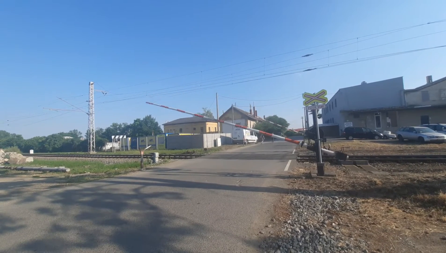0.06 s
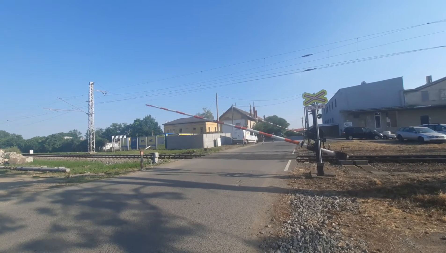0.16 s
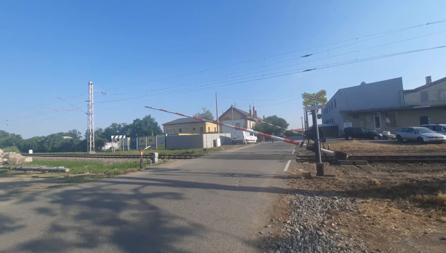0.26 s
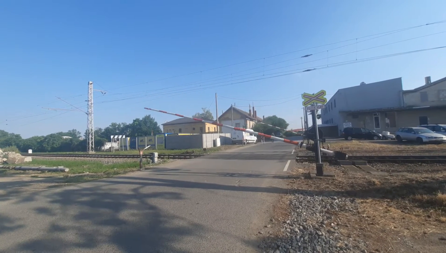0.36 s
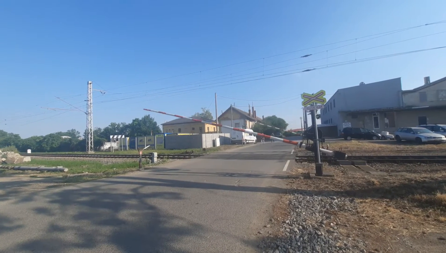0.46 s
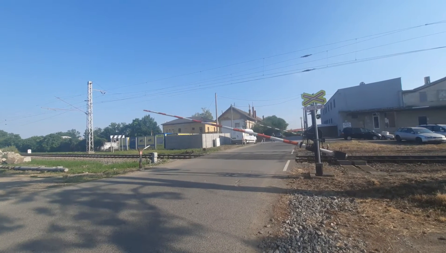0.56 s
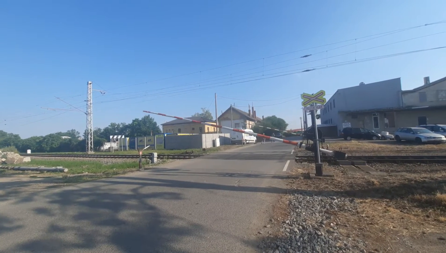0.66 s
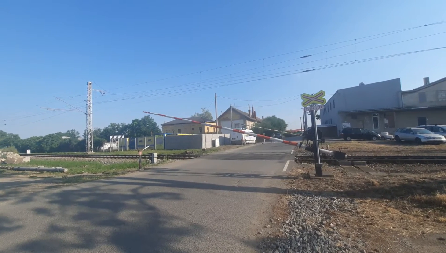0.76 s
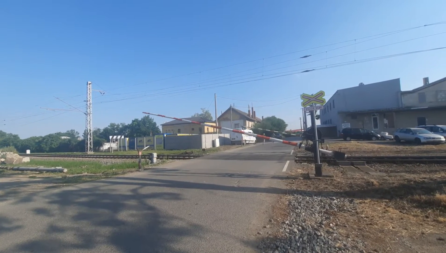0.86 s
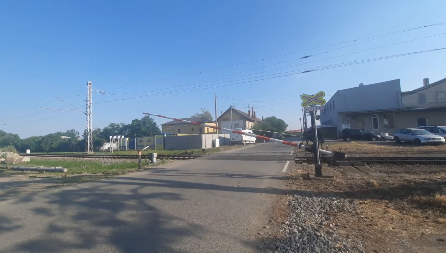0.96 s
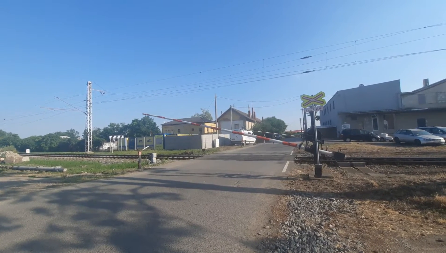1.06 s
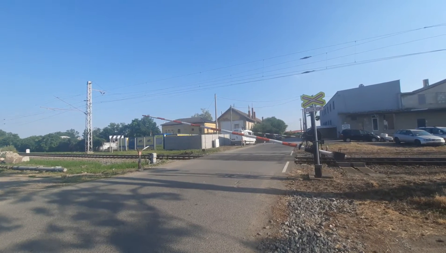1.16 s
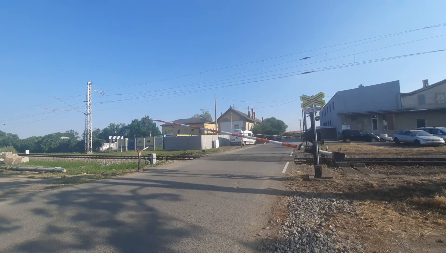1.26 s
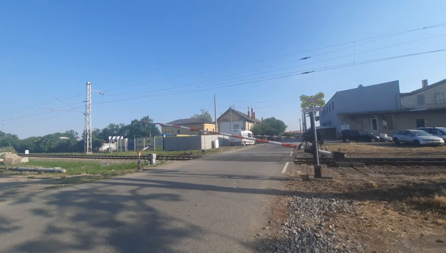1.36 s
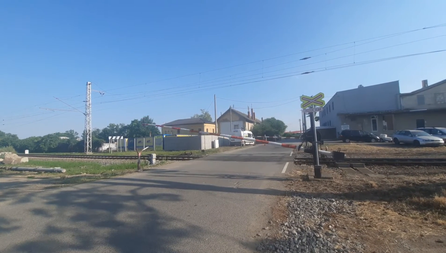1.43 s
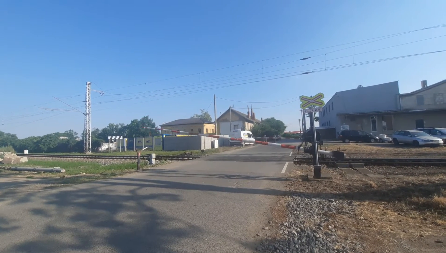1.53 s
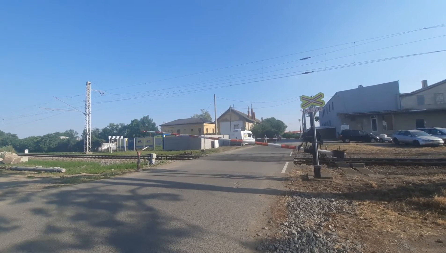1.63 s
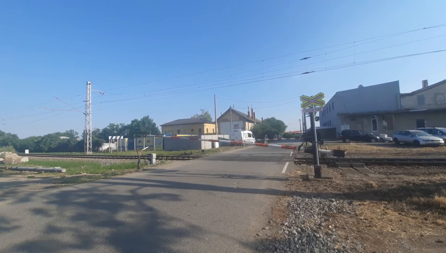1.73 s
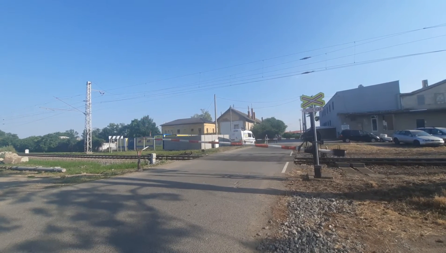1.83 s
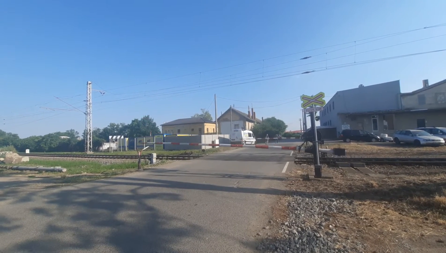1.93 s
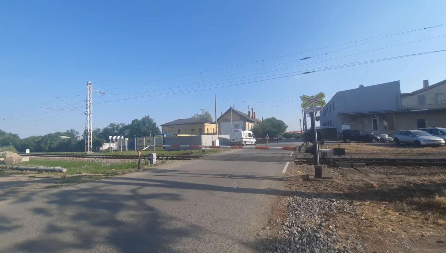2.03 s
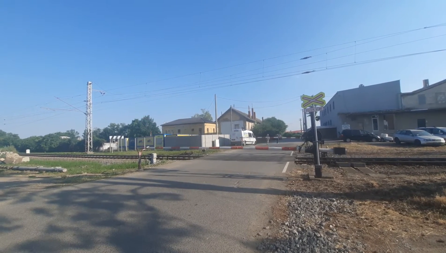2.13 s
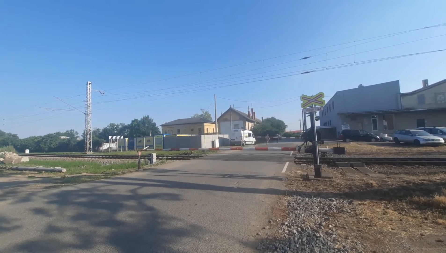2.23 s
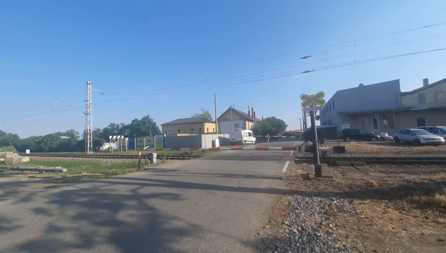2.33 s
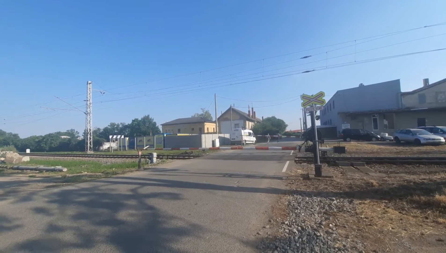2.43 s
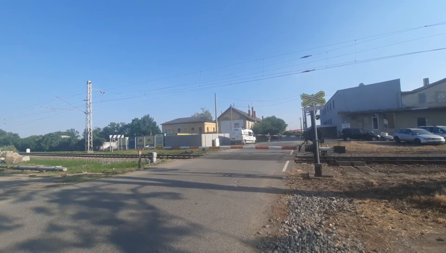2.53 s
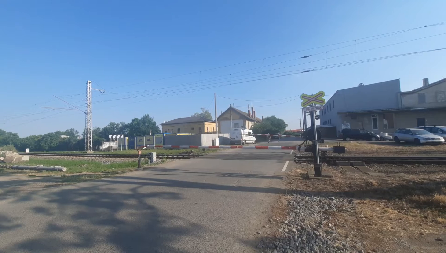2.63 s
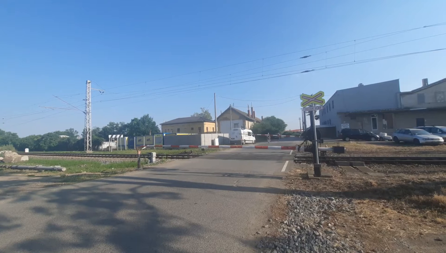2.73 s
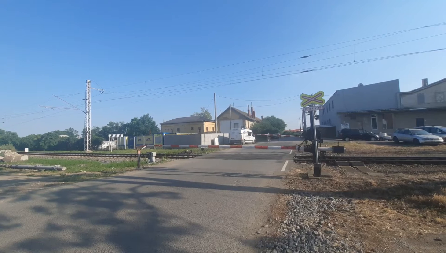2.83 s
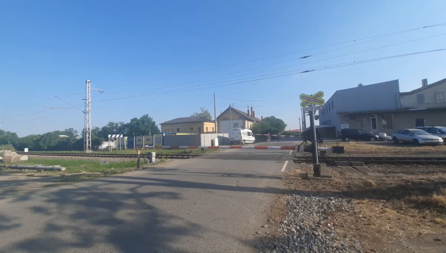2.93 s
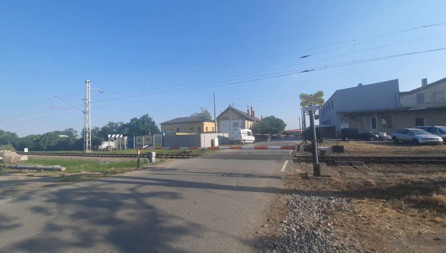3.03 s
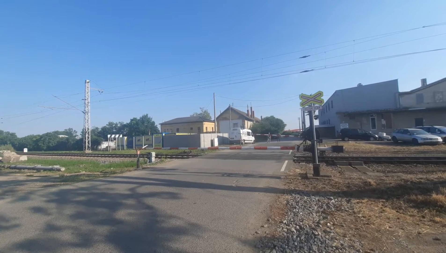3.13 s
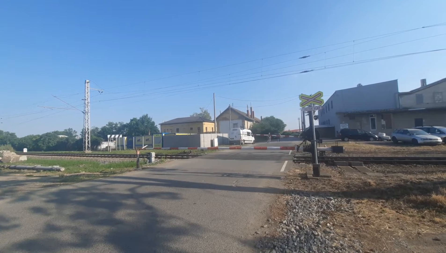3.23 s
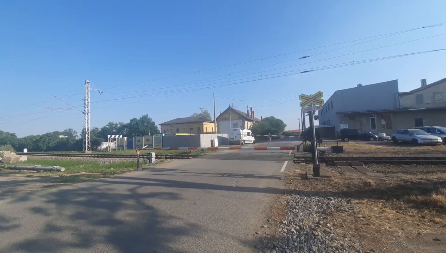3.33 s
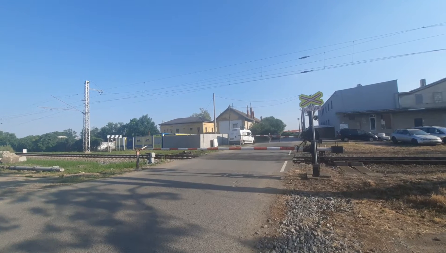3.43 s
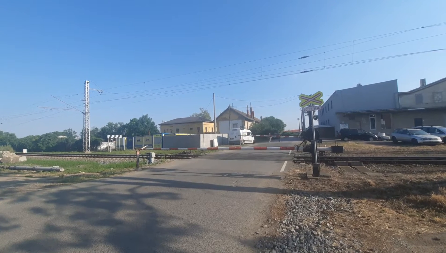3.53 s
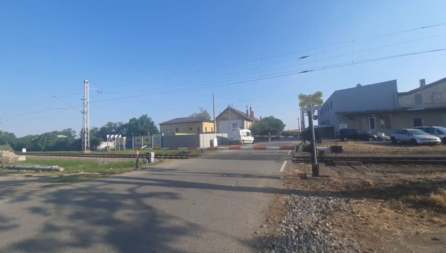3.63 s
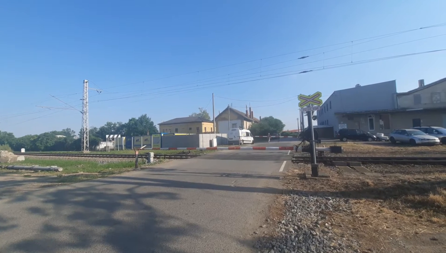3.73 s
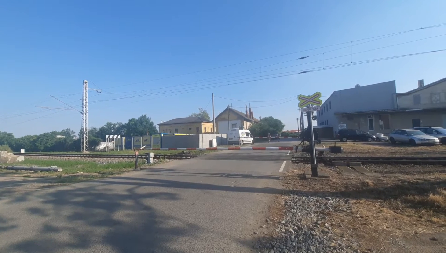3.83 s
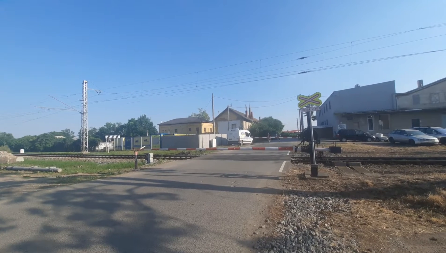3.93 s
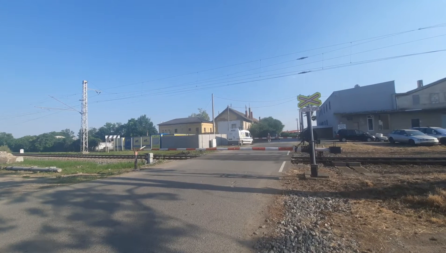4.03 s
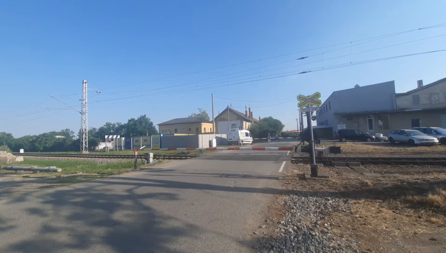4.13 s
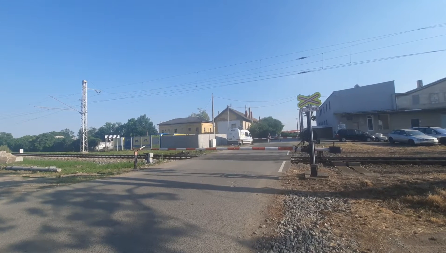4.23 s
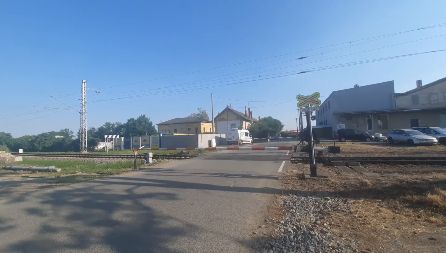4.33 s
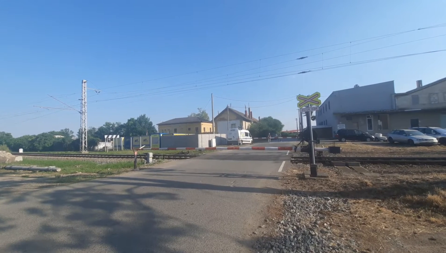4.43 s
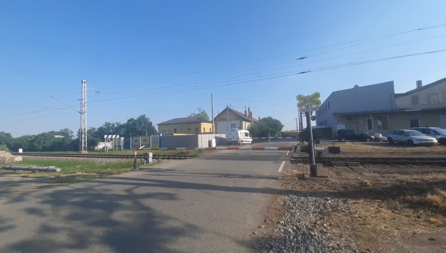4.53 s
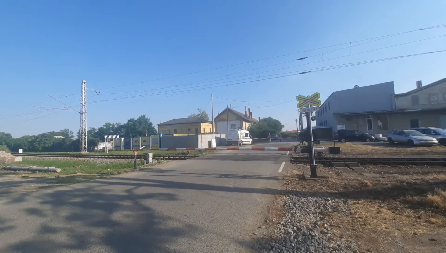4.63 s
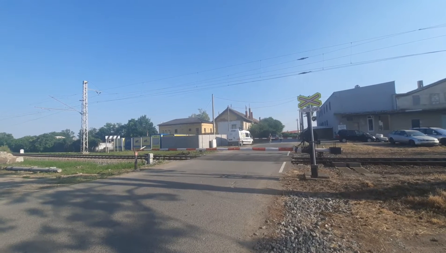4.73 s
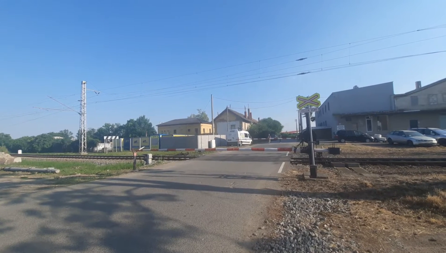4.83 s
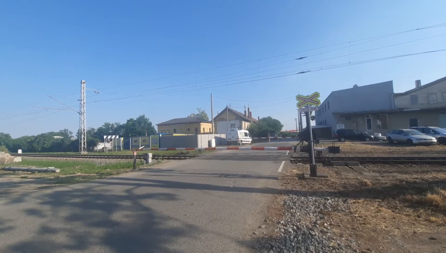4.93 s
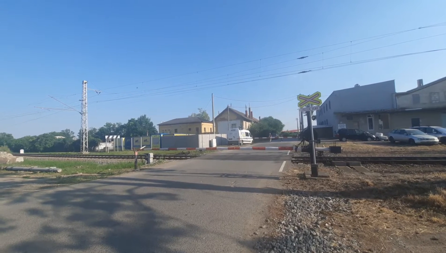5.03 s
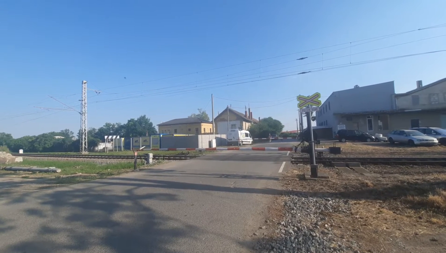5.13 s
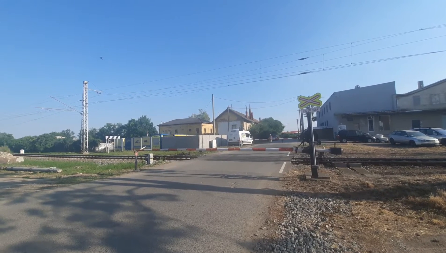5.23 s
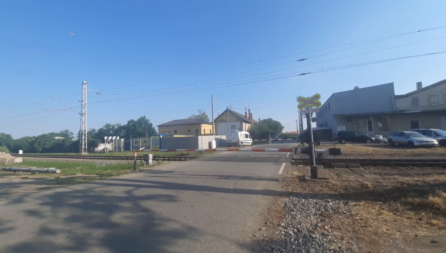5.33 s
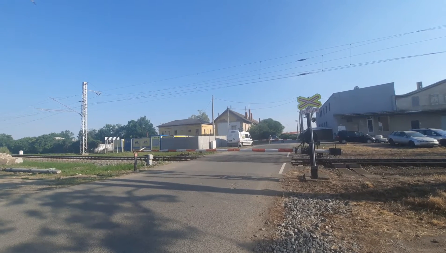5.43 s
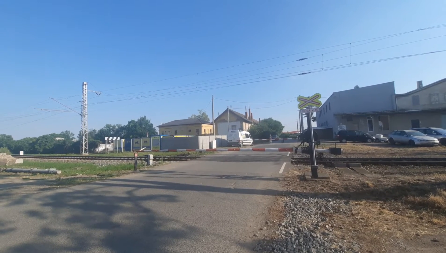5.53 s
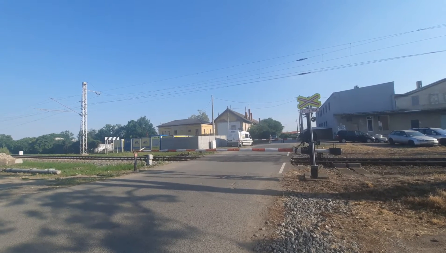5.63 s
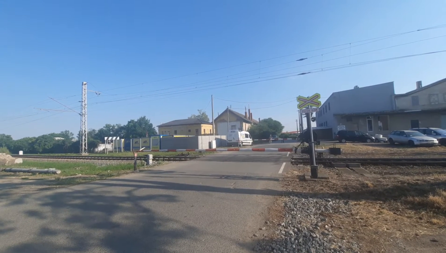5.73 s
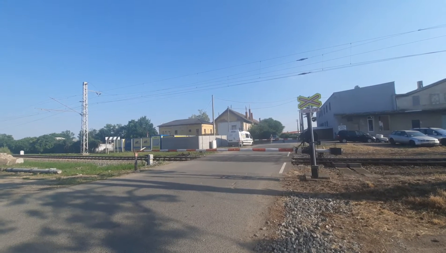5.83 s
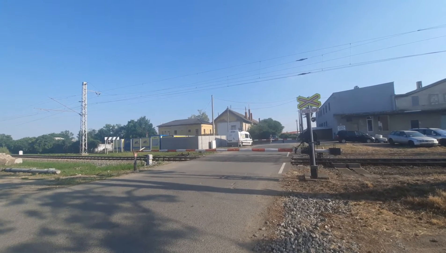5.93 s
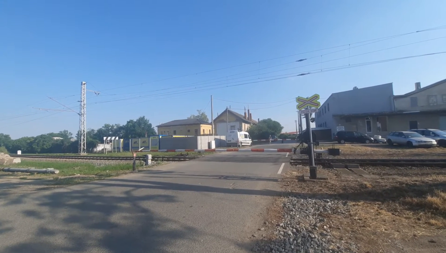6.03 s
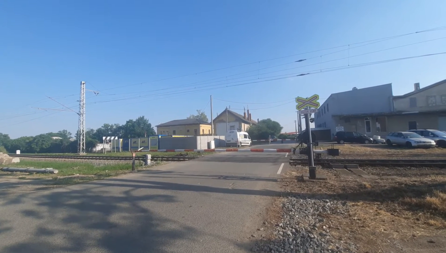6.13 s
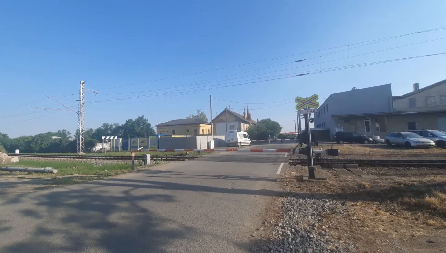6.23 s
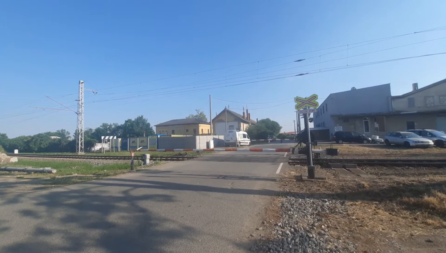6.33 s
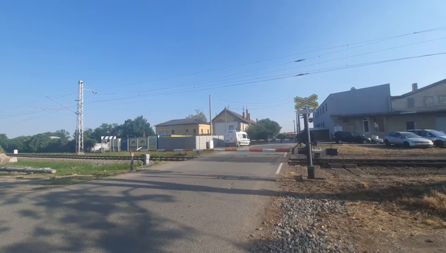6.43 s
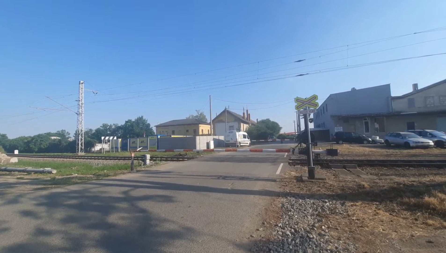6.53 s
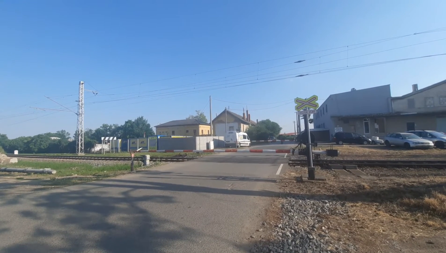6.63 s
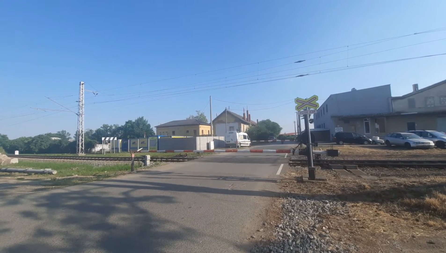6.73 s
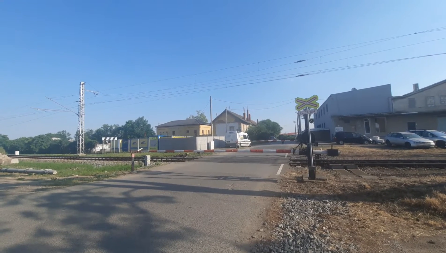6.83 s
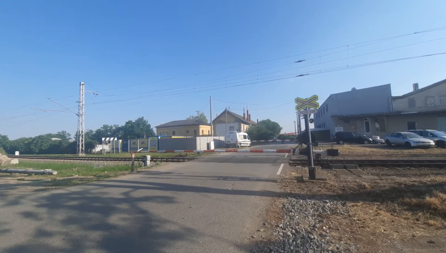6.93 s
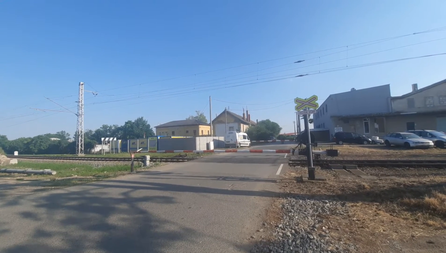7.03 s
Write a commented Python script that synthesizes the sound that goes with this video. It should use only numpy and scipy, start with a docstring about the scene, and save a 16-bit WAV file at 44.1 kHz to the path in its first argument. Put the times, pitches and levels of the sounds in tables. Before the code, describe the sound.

A close stereo microphone hears steel barrier machinery outdoors: grainy grinding, a thin whine and dense clattering judders, growing stronger before the boom strikes its rest. Several solid clunks ring the housing, then scattered knocks and rattles fade. Bright latch clicks come in two small groups, the second isolated in quiet. Faint bird whistles and buzzes, low wind bumps and a soft late rumble surround the mechanism.

```python
"""Barrier booms come down at a rural level crossing: gear noise and judders ring the modes of a steel housing.
The booms land and bounce with clunks, then latches click: each blow is a solid hit plus a noisy rattle. A
grainy noise band makes the gear whine; gliding tones and noise bands make pivot squeaks, short rattle ticks and
bird calls. Coloured noise makes the wind on the microphone ports, a faint outdoor hush and a late distant
rumble."""
import sys
import numpy as np
from scipy import signal
from scipy.fft import rfft, irfft, next_fast_len
from scipy.io import wavfile
from scipy.ndimage import uniform_filter1d

SR = 44100
rng = np.random.default_rng(int(sys.argv[2]) if len(sys.argv) > 2 else 0)


def store_wav(level_fs):
    """Save 16-bit WAV to argv[1]."""
    pcm = np.round(np.clip(np.atleast_2d(level_fs), -1, 1) * 32767)
    wavfile.write(sys.argv[1], SR, pcm.T.astype(np.int16))


N = 312669

# drive grinding, before part offsets: time_s, housing_level_db, brightness_db
DRIVE = [(0, -29.5, -2), (.3, -41, -5), (.55, -40, -6), (1.12, -45.5, 6), (1.25, -46, 8.5),
         (1.45, -33.5, -16), (1.8, -26.5, -0.5), (2.03, -28, 3.5), (2.4, -38.5, -0.5), (2.55, -44, 5.5),
         (2.9, -53, -3.5), (3.03, -43.5, 7), (3.22, -38.5, 8), (3.36, -63.5, 12.5), (3.55, -43.5, -10),
         (3.8, -43, -3), (4.0, -58, -3), (4.25, -62, -2.5), (4.4, -47.5, 1), (4.7, -63, 10.5),
         (5.6, -69.5, -1), (7.09, -73.5, 6.5)]
# judders, clunks, clicks, before part offsets:
# start_s, blow_db, hollow_boom_rel_db, latch_rel_db, rattle_t60_s (before part speed), favoured_housing_hz
KNOCKS = [(0.026, -32.5, -18, -22, 0.18, 730), (0.051, -31, -1.5, -16, 0.031, 680),
          (0.134, -38, -12, -14, 0.17, 598), (0.188, -37.5, 1, -29, 0.73, 860),
          (0.316, -35, -1, -22.5, 0.26, 680), (0.414, -33.5, 0, -36, 0.099, 880),
          (0.447, -32, -1, -15, 0.06, 815), (0.473, -32.5, -11, -13.5, 0.047, 700),
          (0.553, -34.5, -3.5, -14, 0.29, 580), (0.604, -27, -4.5, -16, 0.19, 730),
          (0.64, -46.5, -22, 0, 0.068, 730), (0.72, -37, 3.5, -22.5, 0.19, 598),
          (0.752, -31.5, -6, -36, 0.086, 730), (0.777, -41, 3, -8.5, 0.2, 620),
          (0.869, -27, -1.5, -14.5, 0.15, 897), (0.977, -29.5, -3, -22, 0.11, 790),
          (0.998, -28.5, 1.5, -15.5, 0.11, 674), (1.017, -30, -7.5, -7, 0.23, 905),
          (1.155, -27, -1, -20.5, 0.45, 640), (1.177, -28, -26, -27, 0.14, 840),
          (1.198, -38.5, -8, 5, 0.12, 564), (1.277, -23.5, -7.5, -20, 0.081, 950),
          (1.3, -48.5, 10, 9, 0.2, 605), (1.362, -23.5, -5, -15, 0.44, 874),
          (1.399, -38.5, -14, 1, 0.32, 711), (1.422, -45, -2.5, 1, 0.098, 730),
          (1.459, -29.5, -2, -18, 0.28, 598), (1.478, -32.5, 2, -25.5, 0.084, 644),
          (1.498, -32, -20, -3.5, 0.25, 839), (1.558, -26, 0, -14, 0.29, 860),
          (1.599, -33.5, -11.5, -7, 0.19, 667), (1.658, -27, -3, -29.5, 0.092, 841),
          (1.739, -27, -1.5, -8, 0.1, 557), (1.832, -48.5, 3, -8.5, 0.089, 641),
          (1.884, -12, -6.5, 0.5, 0.14, 757), (1.903, -36, -12, -12, 0.24, 794),
          (2.012, -31, -0.5, -4.5, 0.23, 887), (2.051, -29.5, -19, -11, 0.099, 781),
          (2.111, -29.5, -20.5, -12, 0.12, 619), (2.144, -39, -15, -9, 0.43, 777),
          (2.193, -30, 0, -27, 0.3, 611), (2.237, -43, -7.5, 0, 0.12, 730),
          (2.259, -32, -3, -18, 0.15, 563), (2.313, -40.5, -6, -2.5, 0.099, 745),
          (2.336, -30.5, -4, -26.5, 0.64, 642), (2.4085, -9, -15.5, -15, 0.1, 838),
          (2.416, -30, -0.5, 5.5, 0.17, 890), (2.424, -42, -16, -7.5, 0.08, 904),
          (2.436, -39, -10.5, 0.5, 0.082, 900), (2.451, -31.5, -4, -30.5, 0.1, 878),
          (2.479, -25, -10.5, -7.5, 0.14, 888), (2.549, -14, -12, -17.5, 0.09, 855),
          (2.557, -23.5, -7, -7, 0.08, 852), (2.568, -21.5, -11, -21, 0.021, 900),
          (2.596, -32, -10, -17, 0.21, 869), (2.616, -50, -2.5, -27, 0.14, 870),
          (2.681, -41, -27, -8.5, 0.41, 871.5), (2.745, -42.5, -17, -4, 0.056, 890),
          (2.86, -30.5, -4, -23, 0.18, 795), (2.892, -39, -1.5, -4.5, 0.19, 853),
          (3.008, -34, -6, -5, 0.081, 514), (3.097, -32, -2.5, -29, 0.12, 657),
          (3.156, -24.5, -2.5, -32, 0.32, 950), (3.161, -40, 14, 17.5, 0.029, 1030),
          (3.2, -33, -6, -21, 0.16, 800), (3.215, -31.5, -9.5, -30, 0.24, 890),
          (3.3, -32.5, -6.5, -10, 0.073, 795), (3.355, -37, -45, -11.5, 0.35, 860),
          (3.374, -38, 11, -1, 0.021, 730), (3.498, -37.5, -37, -6.5, 0.15, 780),
          (3.552, -30, -11.5, -18, 0.051, 823), (3.558, -31, -16, -1, 0.0097, 760),
          (3.631, -34.5, -21, -9, 0.12, 730), (3.703, -28, -11, -13.5, 0.14, 798),
          (3.746, -31.5, -5, -7.5, 0.17, 810), (3.829, -41.5, -2, -8.5, 0.23, 750),
          (3.889, -42, -26.5, -10, 0.25, 760), (4.015, -51, -13, -13, 0.19, 726),
          (4.112, -52, -20.5, -13, 0.19, 707), (4.204, -51.5, -18, -19, 0.46, 1080),
          (4.273, -52.5, -4, -5, 0.097, 744), (4.321, -32, -4, -0.5, 0.14, 710),
          (4.325, -45.5, -10, 14.5, 0.023, 770), (4.339, -39.5, -9, 2, 0.65, 810),
          (4.372, -39, -14, -2, 0.13, 786), (4.397, -42.5, -22, 1.5, 0.41, 786),
          (4.436, -51.5, -13.5, 1.5, 0.071, 765), (4.448, -53, -7, 15, 0.06, 740),
          (4.457, -45.5, 4, 14, 0.094, 666), (4.649, -45.5, -21, -10.5, 0.34, 766),
          (4.79, -55.5, -24, -19, 0.28, 750), (4.875, -53, -7, 7, 0.38, 750),
          (4.975, -56, 1, -17, 0.11, 754), (5.098, -60, 5, -2.5, 0.37, 840),
          (5.217, -53.5, -8, -19, 0.25, 754), (5.34, -60, -17.5, -18, 0.16, 754),
          (5.471, -61, 5, -4, 0.69, 698), (5.604, -55, -3.5, -6, 0.25, 860),
          (5.996, -59.5, 4, 2, 0.39, 746), (6.037, -49, -16.5, -7.5, 0.2, 794),
          (6.07, -45.5, -9, 15.5, 0.05, 840), (6.074, -47, -7, 16.5, 0.044, 854),
          (6.078, -53, -5, 2, 0.12, 1530), (6.108, -40, -12, 0, 0.081, 1340),
          (6.112, -36.5, -29, -0.5, 0.032, 844), (6.122, -54, -20, 6.5, 0.36, 1440),
          (6.145, -64, -16, 6.5, 0.76, 835)]
# latch modes favoured by blows, and loose grit, as the boom moves: time_s, favoured_latch_hz, fizz_offset_db
LATCH = [(0, 2700, -7), (.15, 2400, 2), (.45, 2140, 0), (.56, 2660, 1.5), (.75, 2660, 0), (.87, 2060, -5.5),
         (1.05, 2700, 4), (1.15, 2060, 2), (1.37, 2052, 5), (1.45, 2575, 10), (1.74, 2118, 6),
         (1.89, 2598, -1), (2.1, 2700, 5), (2.34, 2700, 9), (2.41, 2313, -2), (2.48, 2510, -0.5),
         (2.7, 2550, -15), (3.0, 2670, -3.5), (3.2, 2770, -20), (3.37, 2560, 3.5), (3.5, 2500, -4),
         (3.56, 2680, -3.5), (4.2, 2660, 4), (4.32, 2480, -8), (4.36, 2250, -15), (4.4, 2400, -12),
         (4.448, 3200, -12), (4.457, 2260, -8.5), (4.65, 2700, -13), (4.88, 2040, -7.5), (6.0, 2250, -7),
         (6.07, 2370, -10.5), (6.11, 2600, -12), (6.15, 2300, -8)]
# steelwork modes: mode_hz, width_hz, shaken_by_gears_db, boom_on_rest_db
BODY = [(184, 260, -16.5, -1), (303.1, 37, -6.5, -2), (362, 32, -11, -0.5), (428, 59, -11.5, -2.5),
        (598, 40, 0.5, -4), (643.3, 24, -0.5, -3), (730, 45, -3.5, -3.5), (786, 25, -6.5, -7),
        (853, 32, -1.5, -7.5), (907, 15, -14, -7.5), (936, 64, -1, -6.5), (1019, 18, -7.5, -9),
        (1087, 77, -4.5, -8.5), (1340, 120, -1, -7.5), (1530, 140, -7.5, -7.5), (1744, 200, -15, -10.5),
        (1788, 43, -26.5, -10), (2025, 390, 9, 6.5), (2300, 77, -1, -2.5), (2392, 180, -1.5, 3.5),
        (2634, 57, 0, -13), (2700, 82, 5, -4.5), (2690, 740, 1.5, -8.5), (2917, 34, -2.5, -3.5),
        (3256, 62, -6, -1.5), (3550, 82, -10, -4.5), (3390, 92, -13, -10), (4260, 230, -14, -4.5)]
# splits the modes into tube, housing and latch: edge_hz
PART_EDGES_HZ = (500, 1900)
# latch pin modes: mode_hz, width_hz, level_db
PIN = [(5150, 130, 0), (7400, 220, 1)]
# relative spectrum of loose parts and grit: freq_hz, density_db_per_hz
FIZZ = [(2060, -26), (3500, -4.5), (3870, -4), (4180, -11), (4460, -10.5), (5160, -5), (6610, -11),
        (7320, -10.5), (8530, -14), (9680, -38.5), (10400, -24), (13300, -24.5), (16000, -45.5)]
# barrier at the two microphone ports: freq_hz, likeness (0-1), left_right_db
PORTS = [(0, 1, -2), (300, 0.94, 2.5), (700, 1, -1.6), (950, 0.4, 8), (1200, 0, 0), (1690, 0, 3),
         (2000, 0.6, -2.5), (2250, 0.6, 5.5), (2600, 0.3, 0), (2960, 0.8, 0), (3500, 0, 5), (3830, 0.01, 3),
         (5100, 0, -3), (6350, 0.6, 1.5), (7800, .4, 7.5), (9600, 0, 2), (16110, .3, -3)]
# phase lead of the left port: freq_hz, lead_rad
PORT_PHASE = [(0, 0), (350, -.3), (860, -.6), (1050, -.9), (1200, -1.7), (1720, -2.8), (2070, -4.8),
              (2250, -6.5), (2750, -5.6), (3100, -7.9), (3450, -11), (4130, -12.4), (5500, -17.4),
              (6900, -18.3), (7750, -21.2), (8600, -23.5), (10700, -28), (16000, -40)]
# gear whine, before the flares: time_s, level_db
WHINE = [(0, -51), (.5, -79.5), (1.1, -68), (1.7, -68.5), (2.1, -59.5), (2.33, -67), (2.5, -64),
         (2.72, -73.5), (2.848, -85), (3.2, -82), (3.45, -78), (3.6, -84), (3.9, -70), (4.05, -87),
         (4.12, -77), (4.22, -65), (4.32, -77.5)]
# wind on the ports, before the lumps: time_s, level_db, left_right_db
WIND = [(0.0, -40.5, -18.5), (0.41, -49, 0), (0.45, -45, 3), (1.07, -57.5, -16.5), (1.97, -57.5, -2),
        (2.07, -56, -31), (2.39, -66.5, 16), (2.49, -47, -9), (2.82, -61, -11), (3.08, -34, 1.5),
        (3.14, -39.5, 7), (3.2, -47.5, 3), (3.53, -60, -17), (3.63, -65, -12), (3.75, -54, 24),
        (3.83, -63, -7), (4.11, -67.5, -18.5), (4.25, -64.5, 19.5), (4.36, -59, -11), (4.72, -66, 3.5),
        (4.95, -57.5, -22.5), (5.15, -58.5, -31), (5.25, -66.5, -15), (5.69, -62, -21.5), (5.81, -70, -3),
        (6.2, -50.5, -14), (6.32, -60, 6), (6.52, -60.5, -21), (6.61, -61, 0.5), (6.85, -54.5, -12.5),
        (7.05, -48, -25), (7.09, -50, -8)]
# relative wind spectrum: freq_hz, density_db_per_hz
WIND_COLOUR = [(12, -46), (25, -35.5), (38, -11), (52, 6), (97, 4), (189, -8.5), (273, -24), (524, -44),
               (755, -38.5), (900, -48.5), (1170, -69.5), (1980, -120)]
# relative hush spectrum: freq_hz, density_db_per_hz
AIR = [(59, -28), (100, -9.5), (160, -4.5), (202, -23), (289, -15.5), (547, -22.5), (1330, -23),
       (1550, -26.5), (2500, -33), (3190, -41.5), (8110, -38), (9410, -43.5), (14700, -35.5), (16000, -45)]
# pivot squeaks, plus short high ticks in the rattle after the landing (2.0-2.25 s): start_s, length_s,
# peak_after_s, first_hz, last_hz, arch_hz, peak_db, left_right_db
SQUEAKS = [(0.15, .22, .055, 2320, 2300, 0, -52, 11), (2.0, .2, .1, 1525, 1520, 0, -57, 0),
           (2.008, .06, .01, 6180, 6150, 0, -60, 0), (2.092, .02, .01, 5650, 5950, 0, -61, 0),
           (2.115, .04, .012, 3350, 3330, 0, -55, 0), (2.155, .02, .008, 4250, 4350, 0, -60, 0),
           (2.238, .06, .01, 6200, 6180, 0, -66, 0), (3.372, .03, .008, 4500, 4480, 0, -66, 0),
           (2.214, .04, .018, 1520, 1520, 0, -41, 4), (2.25, .05, .025, 1520, 1510, 0, -44, -4),
           (2.31, .06, .02, 1520, 1520, 0, -56, 0), (4.436, .022, .012, 1560, 1510, 0, -48, -4),
           (4.478, .03, .01, 1525, 1515, 0, -62, -4), (4.655, .04, .015, 1500, 1510, 0, -72, 0),
           (5.1, .08, .05, 1850, 1830, 0, -79, 0), (6.33, .09, .03, 2420, 2560, 0, -85, 0)]
# whistled bird notes: columns of SQUEAKS
WHISTLES = [(0.76, .09, .026, 5790, 5700, -40, -75, 1), (1.78, .07, .02, 5217, 5240, 0, -55, -4),
            (2.6, .07, .035, 5000, 5050, 650, -66, -8), (2.83, .17, .065, 4780, 5020, 0, -65, 11),
            (4.085, .065, .045, 3090, 3980, 0, -81, 13), (4.23, .07, .024, 2700, 2500, -60, -73, -2),
            (4.248, .03, .014, 3650, 4250, 60, -76, 12), (4.7, .055, .034, 6010, 5950, 30, -76, 17),
            (4.748, .12, .015, 4600, 4540, 30, -67, 20), (4.835, .04, .012, 4200, 4350, 0, -71, 11),
            (4.872, .035, .015, 4600, 4680, 0, -72, 15), (4.995, .04, .012, 4400, 4350, 0, -78, 13),
            (5.04, .045, .025, 4250, 4280, 30, -80, 13), (5.095, .09, .02, 3350, 3330, 0, -80, 10),
            (5.205, .03, .012, 3950, 3750, 0, -80, 10), (5.495, .055, .02, 2740, 2740, 0, -79, -1),
            (5.62, .08, .03, 2750, 2760, 0, -81, -1), (5.553, .125, .02, 4080, 4060, -90, -75, 21)]
# buzzy bird notes: columns of SQUEAKS
BUZZES = [(4.76, .2, .08, 3900, 4200, 0, -75, 13), (4.93, .16, .04, 4300, 4100, 0, -78, 13),
          (5.09, .09, .015, 4100, 3900, 0, -81, 10), (5.32, .09, .015, 3950, 3900, 0, -83, 10),
          (5.47, .23, .04, 2410, 2700, 0, -79, 2), (5.69, .26, .07, 7400, 7450, -150, -68, 4),
          (6.55, .15, .09, 6880, 6650, -50, -86, 6), (6.45, .1, .03, 1620, 1570, 0, -78, -2),
          (6.69, .35, .05, 1560, 1495, 0, -75, 8)]
# distant rumble, swelling late: time_s, level_db, left_right_db
RUMBLE = [(4.6, -79, -2.5), (5.9, -85, -3), (6.08, -66, -7), (6.28, -69, 1), (6.43, -59.5, 0.5),
          (6.81, -57, 1), (7.09, -59, 1)]
# relative rumble spectrum: freq_hz, density_db_per_hz
RUMBLE_COLOUR = [(88, -25.5), (150, -0.5), (189, -19.5), (279, -5.5), (393, -22), (537, -36.5), (600, -51),
                 (780, -64.5), (1320, -120)]

LANDING_S, LATCHED_S = 1.88, 4.3  # boom meets its rest; latch pin rings in later knocks
EDGE_DB, FIZZ_DB = -20, -28  # gear edge and fizz re housing, at brightness 0
SOLID_DB, KNOCK_FIZZ_DB = 23, -12.5  # solid blow re rattle; fizz re latch
RATTLE_DB, PIN_DB = -4, 21  # trim of the rattle; pin re fizz
FIZZ_SLOPE, KNOCK_FIZZ_SLOPE = 1.4, 1.39  # fizz dB per dB of brightness or latch level
RATTLE_SHAPE = 1.216  # above 1: holds a moment, then drops
JUDDER_SOFTER, JUDDER_WIDER = 2.2, 3  # re blows on the rest: slower swell, wider group of modes
FAVOUR_WIDTH, FAVOUR_SOLID, FAVOUR_RATTLE = .09, .08, .45  # log width; share left to the other modes
WHINE_HZ, WHINE_WIDTH_HZ, WHINE_PAN_DB = 2754, 130, 3.5
WHINE_JOLT_DB, WHINE_JOLT_S = 10, 0.043  # range and decay of the flare
LUMPS_DB, LUMP_S, SWAP_DB = 1.5, 0.1, 3  # wind lumps; left-right wander
AIR_DB = -70.5
EDGE_HZ = 15900
RING_LEN = 8000  # samples


def gain_of(db):
    """Decibels to amplitude."""
    return 10 ** (np.asarray(db) / 20)


def evened(x):
    """Scales to unit rms."""
    return x / np.sqrt(np.mean(x ** 2) + 1e-20)


def columns(rows, t):
    """Reads each column of a curve table at t."""
    s, *values = np.transpose(rows)
    return [np.interp(t, s, v) for v in values]


def coloured(x, points):
    """Filters noise to a (freq_hz, db) spectrum, at unit rms gain."""
    f_hz, db = np.transpose(points)
    size = next_fast_len(x.shape[-1])
    bins_hz = np.fft.rfftfreq(size, 1 / SR)
    gain = gain_of(np.interp(np.log(bins_hz + 1), np.log(f_hz + 1), db))
    return irfft(rfft(x, size) * evened(gain), size)[..., :N]


def resonate(x, hz, width_hz):
    """Resonance along the curve hz: shift to zero, smooth, shift back."""
    turn = np.exp(2j * np.pi * np.cumsum(hz * np.ones(len(x))) / SR)
    r = np.exp(-np.pi * width_hz / SR)
    smooth = signal.lfilter([1 - r], [1, -r], x / turn + 1e-18)
    return 2 * (turn * smooth).real


def panned(x, pan_db):
    """Two channels that differ by pan_db."""
    return np.array([x * gain_of(pan_db / 2), x * gain_of(-pan_db / 2)])


def notes(tables, spread, tonal):
    """Mixes a tone and a noise band along each pitch curve; spread is band width per stage over mean pitch."""
    out = np.zeros((2, N))
    for rows in tables:
        t = np.arange(rows[0][0], rows[-1][0], 1 / SR)
        hz, db, pan_db = columns(rows, t)
        width_hz = spread * hz.mean()
        tone = np.sin(2 * np.pi * np.cumsum(hz) / SR)
        noise = resonate(rng.standard_normal(len(t)), hz, width_hz)
        noise = evened(resonate(noise, hz, width_hz))
        voice = evened(tonal * tone + (1 - tonal) * noise)
        fade = signal.windows.tukey(len(t), .2)
        at = round(t[0] * SR)
        out[:, at:at + len(t)] += panned(gain_of(db) * voice * fade, pan_db)
    return out


def contours(rows, start_db, end_db):
    """Note rows to curves: arched glide, level from start_db up to the peak and down to end_db."""
    tables = []
    for start_s, length_s, peak_s, first_hz, last_hz, arch_hz, peak_db, pan_db in rows:
        u = np.linspace(0, 1, num=24)
        hz = first_hz + (last_hz - first_hz) * u + arch_hz * np.sin(np.pi * u)
        knees_s = [0, min(peak_s, .9 * length_s), length_s]
        level_db = peak_db + np.interp(u * length_s, knees_s, [start_db, 0, end_db])
        tables.append(np.transpose([start_s + u * length_s, hz, level_db, pan_db + 0 * u]))
    return tables


def modes():
    """Each mode's decaying ring after one tap, and its part (0 tube, 1 housing, 2 latch)."""
    hz, width_hz = np.transpose(BODY)[:2, :, None]
    t = np.arange(RING_LEN) / SR
    rings = np.sqrt(width_hz) * np.exp(-np.pi * width_hz * t) * np.sin(2 * np.pi * hz * t)
    return rings, np.searchsorted(PART_EDGES_HZ, hz[:, 0])


def ring_of(weights, rings):
    """Weighted sum of modes at unit energy."""
    ring = weights @ rings
    return ring / np.linalg.norm(ring)


def gear_roughness(length):
    """Noise under uneven tooth contacts: two paths, four steady rows and three rattle rows."""
    contact_db = 2.6 * np.minimum(rng.exponential(1, length // 40 + 1), 5)
    grit = gain_of(contact_db).repeat(40)[:length]
    return evened(grit) * rng.standard_normal((2, 7, length))


def latch_pin(strikes):
    """The pin rings in its own modes after each strike."""
    t = np.arange(SR // 3) / SR
    hz, width_hz, db = np.transpose(PIN)[:, :, None]
    rings = np.exp(-np.pi * width_hz * t) * np.sin(2 * np.pi * hz * t)
    ring = ring_of(gain_of(db[:, 0]), rings)
    return gain_of(PIN_DB) * signal.oaconvolve(strikes, ring)[:N]


def chatter(strength, per_s=500, spread_db=2.5):
    """Loose bolts and links tick, each a short ring of its own pitch; two paths."""
    out, t = np.zeros((2, N + 600)), np.arange(600) / SR
    for place, pitch, size, cycles, side in rng.random((round(per_s * N / SR), 5)):
        at, hz = int(place * N), 2000 * 3.3 ** pitch
        bend = 1 + 6 * (side - .5) * t
        tick = np.sin(2 * np.pi * hz * t * bend) * np.exp(-t * hz / (1.7 + 5 * cycles))
        level = gain_of(-spread_db * np.log(size + 0.014) - 9 * pitch)
        out[:, at:at + 600] += strength[at] * level * tick * [[1], [2 * side - 1]]
    return out[:, :N]


def shifting(x, patchy_db=2.0):
    """Parts touch and part as they rattle, so resonances come and go in time-frequency patches."""
    z = signal.stft(x, nperseg=256, noverlap=192)[2]
    patches = uniform_filter1d(rng.standard_normal(z.shape[1:]), size=3, axis=0)
    patches = evened(uniform_filter1d(patches, size=14, axis=1))
    gain = evened(gain_of(patchy_db * patches))
    return signal.istft(z * gain, nperseg=256, noverlap=192)[1][:, :N]


def knocks(rings, part_of, signs, rough, loose):
    """Each blow hits the modes near its place, then rattles; adds latch and fizz power to loose."""
    t = np.arange(SR // 3) / SR
    blows, rattles = np.zeros(N + RING_LEN), np.zeros((2, N + len(t) + RING_LEN))
    cracks, pins = np.zeros((2, N))
    mode_hz, _, *mode_db = np.transpose(BODY)
    # rows: tube, housing, latch, fizz
    rise_s = np.array([[.004], [.0015], [.0005], [.0003]])
    speed = np.array([[.9], [1.1], [1.8], [1.9]])  # treble rattle dies sooner
    contact_s = np.array([[.004], [.0012], [.0011]])
    places = columns(LATCH, np.transpose(KNOCKS)[0])
    for knock, latch_hz, fizz_db in zip(KNOCKS, *places):
        start_s, blow_db, boom_db, latch_db, t60_s, housing_hz = knock
        judder = start_s < LANDING_S
        knock_fizz_db = KNOCK_FIZZ_SLOPE * latch_db + KNOCK_FIZZ_DB + fizz_db
        peak = gain_of(blow_db + np.array([[boom_db], [-4], [latch_db - 4.5], [knock_fizz_db]]))
        soft = np.array([[1], [JUDDER_SOFTER if judder else 1], [1], [1]])
        swell = 1 - np.exp(-(t[:RING_LEN] / contact_s / soft[:3]) ** 2)
        decay = np.exp(-np.log(1000) * (t * speed / max(t60_s, .02)) ** RATTLE_SHAPE)
        burst = peak * (1 - np.exp(-t / rise_s / soft)) * decay
        at = round(start_s * SR)
        loose[:, at:at + len(t)] += burst[2:, :N - at] ** 2
        solid = peak[:, 0] * gain_of(SOLID_DB + np.array([3, 4, 3.0, -20.5]))
        cracks[at] = solid[3]
        pins[at] = peak[3, 0] * (start_s > LATCHED_S)
        width, order = (FAVOUR_WIDTH * JUDDER_WIDER, signs) if judder else (FAVOUR_WIDTH, 1)
        for part, hz in enumerate([300, housing_hz, latch_hz]):
            near = np.exp(-(np.log(mode_hz / hz) / width) ** 2)
            own = gain_of(mode_db[int(start_s > LANDING_S)]) * (part_of == part)
            hit = ring_of(order * own * (FAVOUR_SOLID + near), rings)
            blows[at:at + RING_LEN] += solid[part] * swell[part] * hit
            ring = ring_of(signs * own * (FAVOUR_RATTLE + near), rings)
            shake = burst[part] * rough[:, 4 + part, at:at + len(t)]
            rattles[:, at:at + len(t) + RING_LEN - 1] += signal.fftconvolve(shake, ring[None], axes=1)
    return blows[:N] + latch_pin(pins), cracks, rattles[:, :N]


def grinding(push, rings, part_of, signs):
    """Steady gear noise rings each part; mode levels change at the landing."""
    out, landed = np.zeros((2, N)), round(LANDING_S * SR)
    for mode_db, a, b in zip(np.transpose(BODY)[2:], (0, landed), (landed, N)):
        for part in range(3):
            ring = ring_of(signs * gain_of(mode_db) * (part_of == part), rings)
            shake = np.pad(push[:, part, a:b], [(0, 0), (0, N - b)])
            out[:, a:] += signal.oaconvolve(shake, ring[None], axes=1)[:, :N - a]
    return out


def barrier():
    """Gear grit, solid blows and rattles ring the steel; loose parts fizz and tick; two paths."""
    level_db, bright_db = columns(DRIVE, np.arange(N) / SR)
    edge_db = level_db + bright_db + EDGE_DB
    fizz_db = level_db + FIZZ_SLOPE * bright_db + FIZZ_DB
    steady = gain_of(np.array([level_db - 5.5, level_db - 8.0, edge_db, fizz_db]))
    loose = steady[2:] ** 2  # power of latch and fizz
    rough = gear_roughness(N + SR // 3)
    rings, part_of = modes()
    signs = (-1) ** np.arange(len(BODY))
    blows, cracks, rattles = knocks(rings, part_of, signs, rough, loose)
    push = steady * rough[:, :4, :N]
    fizz = np.sqrt(loose[1]) * rough[:, 3, :N] + [[1], [0]] * cracks
    out = coloured(fizz, FIZZ) + gain_of(1.5) * chatter(np.sqrt(loose[0]))
    out += gain_of(RATTLE_DB) * rattles + grinding(push, rings, part_of, signs)
    return shifting(out) + [[1], [0]] * blows


def ports(paths):
    """Both ports share path one, phase-shifted; path two enters them in opposite sign."""
    size = next_fast_len(N)
    hz = np.fft.rfftfreq(size, 1 / SR)
    (alike, balance_db), (phase_rad,) = columns(PORTS, hz), columns(PORT_PHASE, hz)
    alike = np.clip(alike, 0, 1)
    common, apart = rfft(paths, size) * np.sqrt([1 + alike, 1 - alike]) / np.sqrt(2)
    turn = np.exp(.5j * phase_rad)
    spectra = np.array([(common + apart) * turn, (common - apart) / turn])
    return irfft(spectra * panned(0.66, balance_db), size)[:, :N]


def whine():
    """Grainy gear whine: a noise band of constant pitch that flares with each knock."""
    jolts = np.zeros(N)
    jolts[np.round(np.transpose(KNOCKS)[0] * SR).astype(int)] = 1
    flare = np.minimum(signal.lfilter([1], [1, -np.exp(-1 / (WHINE_JOLT_S * SR))], jolts), 1)
    rows = [(s, WHINE_HZ, db, WHINE_PAN_DB) for s, db in WHINE]
    return gain_of(WHINE_JOLT_DB * (flare - .5)) * notes([rows], WHINE_WIDTH_HZ / WHINE_HZ, 0)


def wind():
    """Low lumpy turbulence, mostly separate at each port."""
    db, pan_db = columns(WIND, np.arange(N) / SR)
    a, b, *slow = rng.standard_normal((4, N))
    size = int(LUMP_S * SR)
    lumps, swap = [evened(uniform_filter1d(uniform_filter1d(v, size), size)) for v in slow]
    gusts = coloured(np.array([a, 0.22 * a + 0.6 * b]), WIND_COLOUR)
    return evened(gusts) * panned(gain_of(db + LUMPS_DB * lumps), pan_db + SWAP_DB * swap)


def air():
    """Faint outdoor hush: steady coloured noise."""
    return gain_of(AIR_DB) * evened(coloured(rng.standard_normal((2, N)), AIR))


def surroundings(x, t60_s):
    """Sparse echoes from road, posts and walls; echo bass is the same pattern at both ports."""
    taps = np.zeros((2, SR // 2))
    jitter = rng.integers(0, 20, (2, (SR // 2 - 101) // 20))
    at = np.arange(100, SR // 2 - 20, 20) + jitter
    np.put_along_axis(taps, at, rng.choice([-1., 1.], at.shape), 1)
    lowpass = signal.butter(2, 900, fs=SR, output="sos")
    taps[1] += signal.sosfiltfilt(lowpass, taps[0] - taps[1])
    taps *= gain_of(-60 * np.arange(SR // 2) / SR / t60_s)
    return signal.fftconvolve(x, taps / np.linalg.norm(taps[0]), axes=1)[:, :N]


def squeaks():
    """Pivot squeaks and short high rattle ticks: mostly tone, a little narrow noise."""
    return notes(contours(SQUEAKS, start_db=-4, end_db=-15), 0.03, 0.75)


def birds():
    """Whistles mix tone and thin noise; buzzes are a wide noise band."""
    whistles = notes(contours(WHISTLES, start_db=-7.0, end_db=-15.5), 0.03, 0.57)
    buzzes = notes(contours(BUZZES, start_db=-6.5, end_db=-21.5), 0.14, 0)
    return whistles + buzzes


def rumble():
    """Dull distant noise, partly alike at both ports."""
    db, pan_db = columns(RUMBLE, np.arange(N) / SR)
    a, b = rng.standard_normal((2, N))
    noise = evened(coloured(np.array([a, 0.77 * a + .7 * b]), RUMBLE_COLOUR))
    return noise * panned(gain_of(db), pan_db)


def scene():
    """Sums all sources; birds carry relatively more echo than the barrier."""
    near = ports(barrier()) + squeaks() + whine()
    calls = birds()
    near_echo = gain_of(-9.5) * surroundings(near, t60_s=0.42)
    bird_echo = gain_of(-5) * surroundings(calls, t60_s=0.32)
    return near + calls + near_echo + bird_echo + wind() + air() + rumble()


def record(dry):
    """Band limit: linear-phase low-pass at EDGE_HZ."""
    lowpass = signal.firwin(511, EDGE_HZ, window=("kaiser", 9), fs=SR)
    return signal.oaconvolve(dry, lowpass[None], "same")


dry = scene()
out = record(dry)
store_wav(out)
```